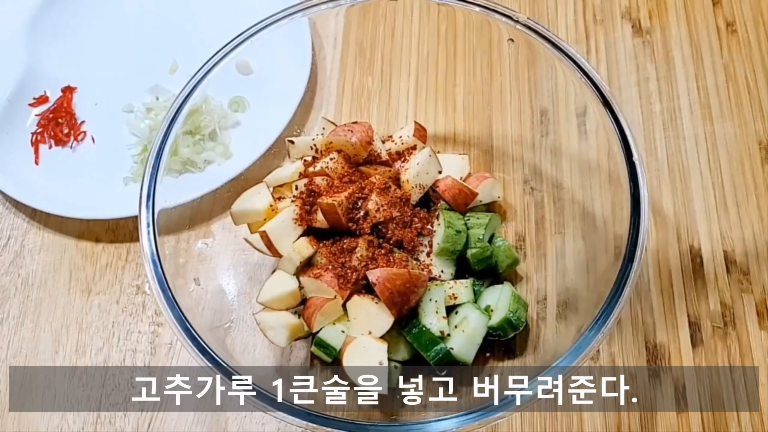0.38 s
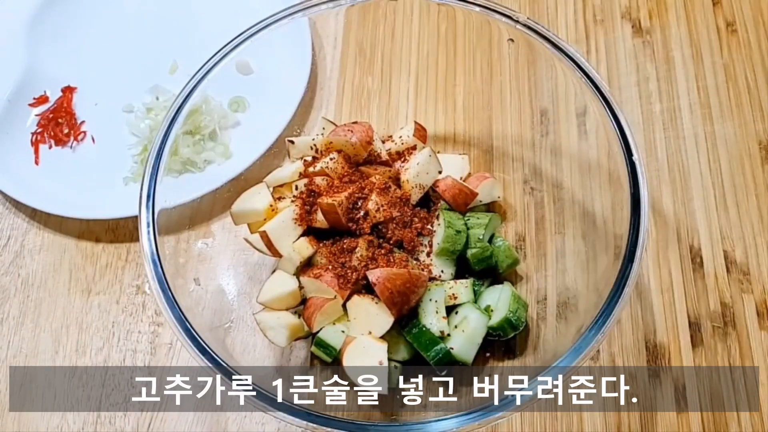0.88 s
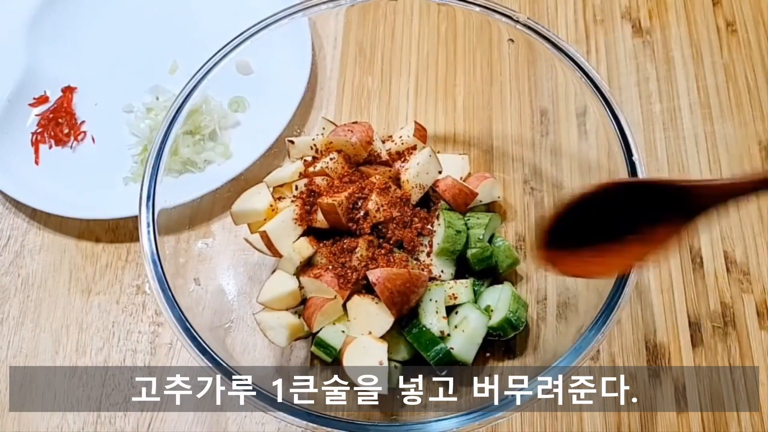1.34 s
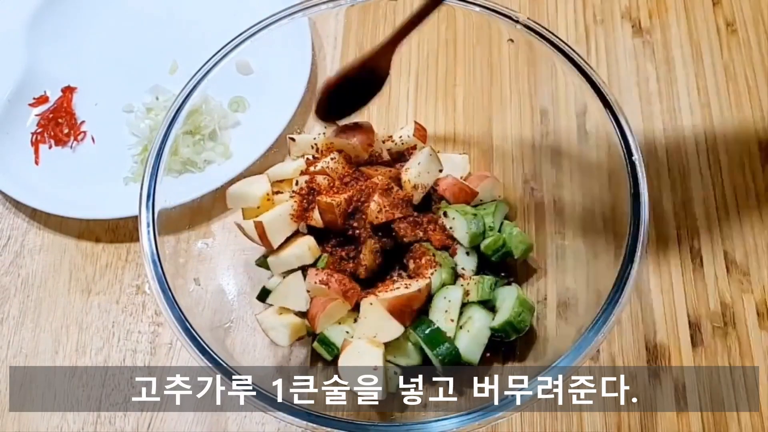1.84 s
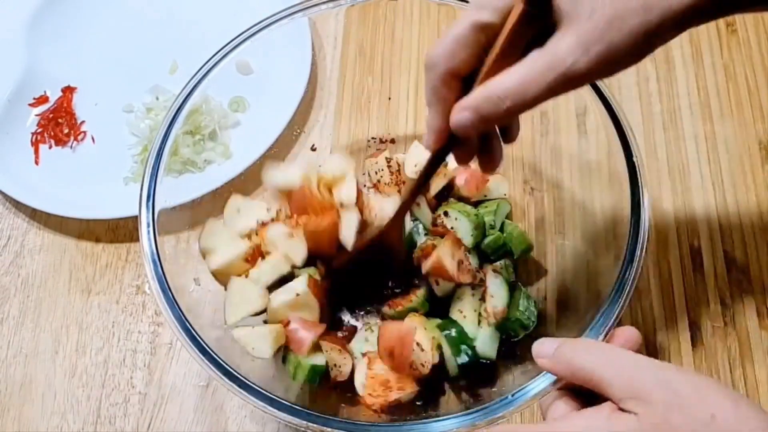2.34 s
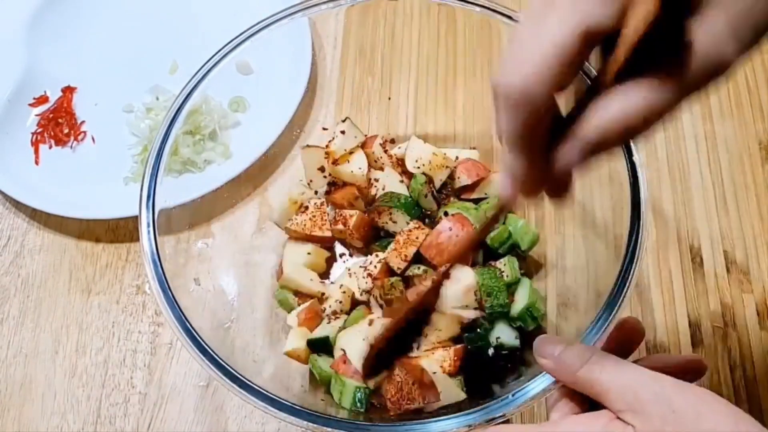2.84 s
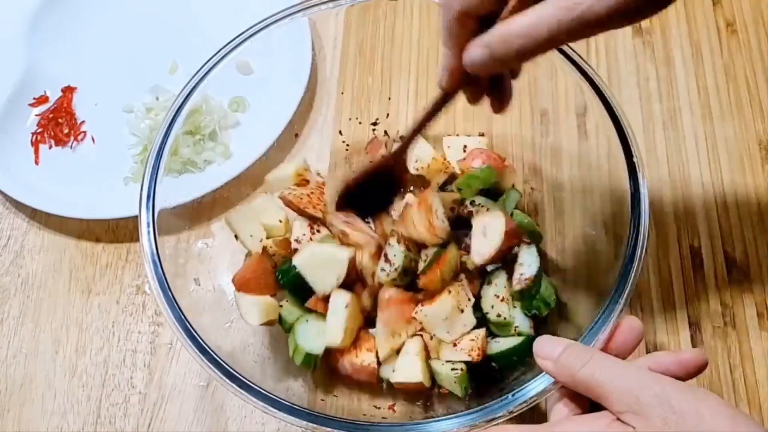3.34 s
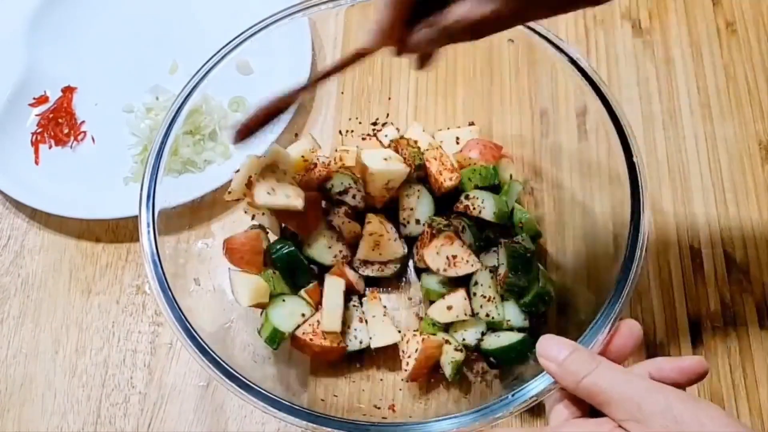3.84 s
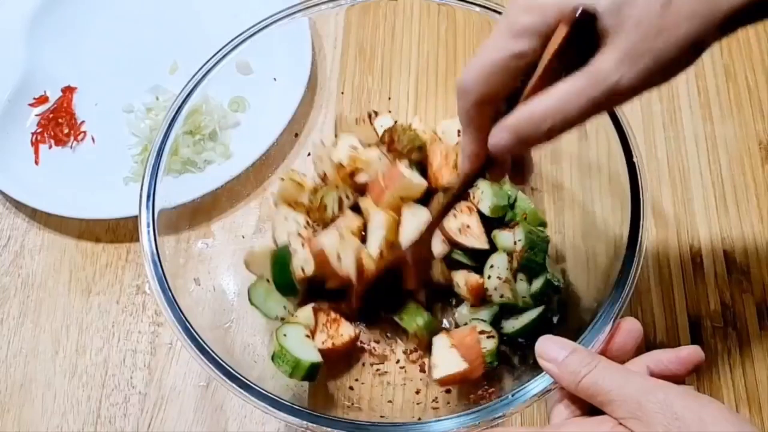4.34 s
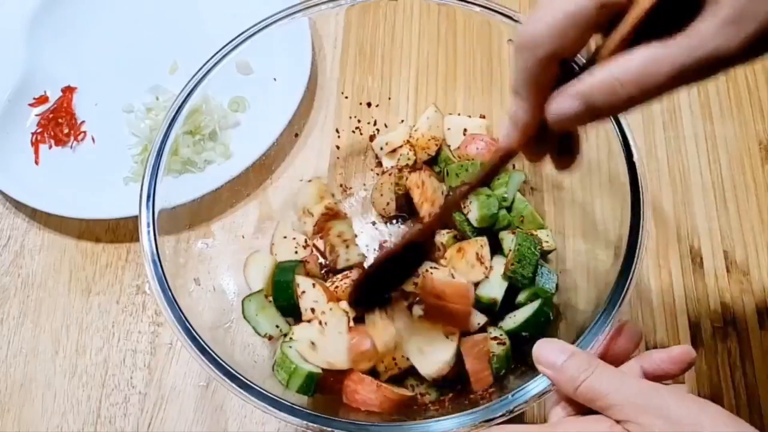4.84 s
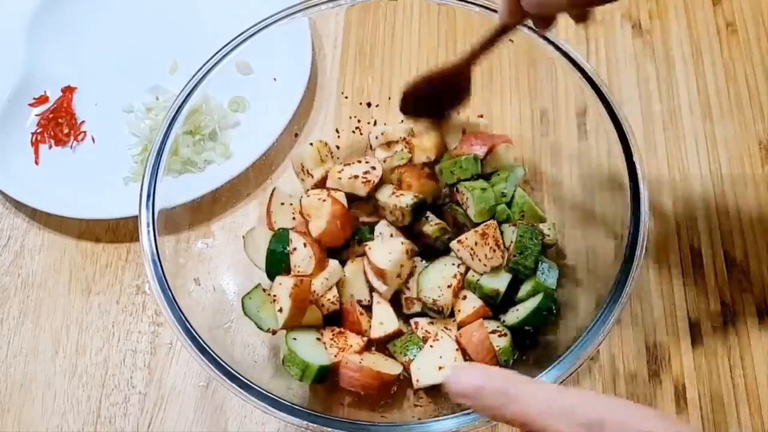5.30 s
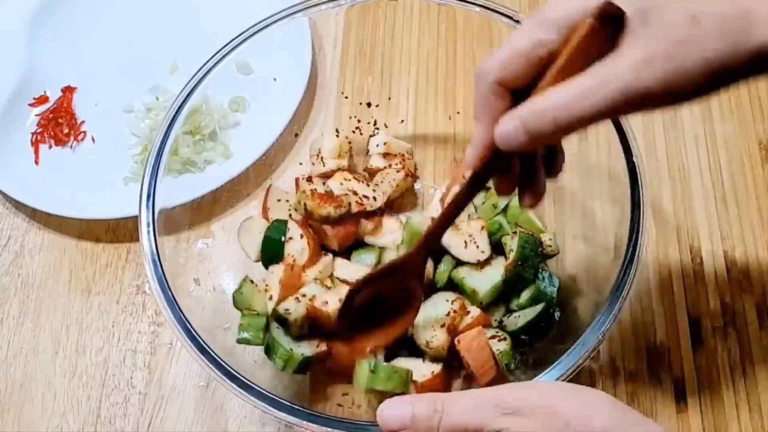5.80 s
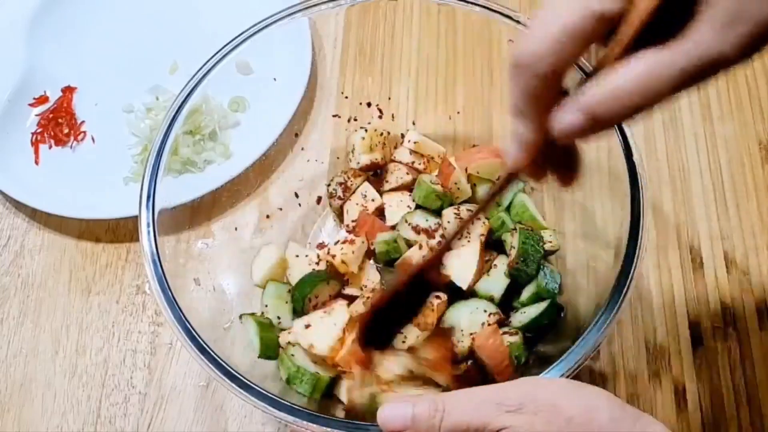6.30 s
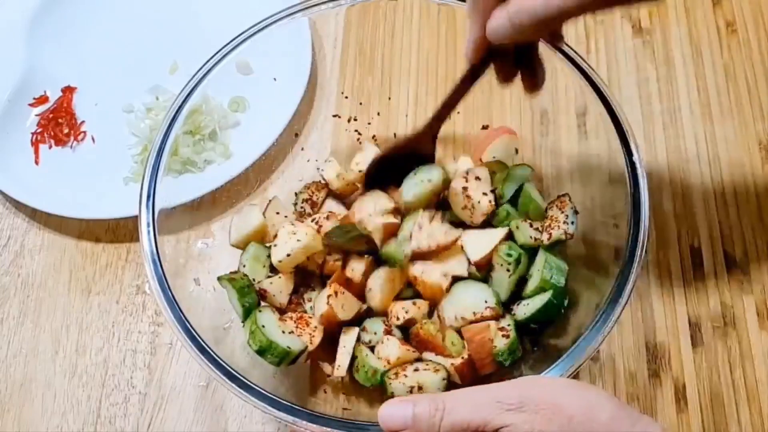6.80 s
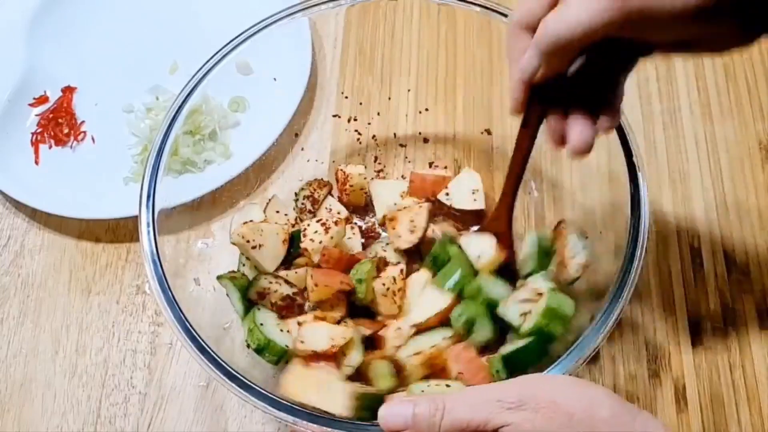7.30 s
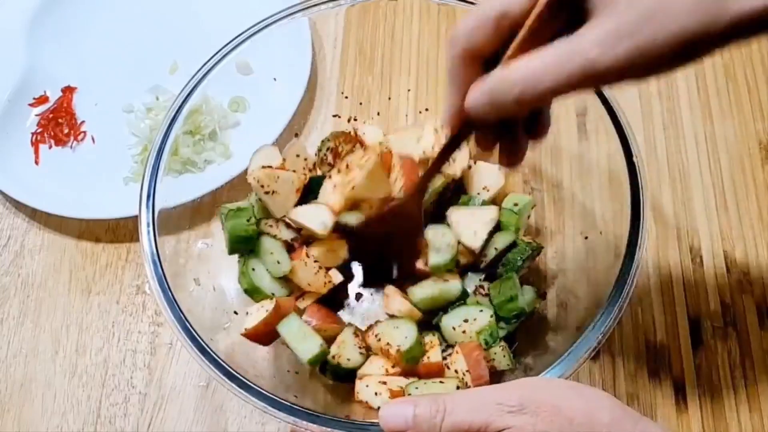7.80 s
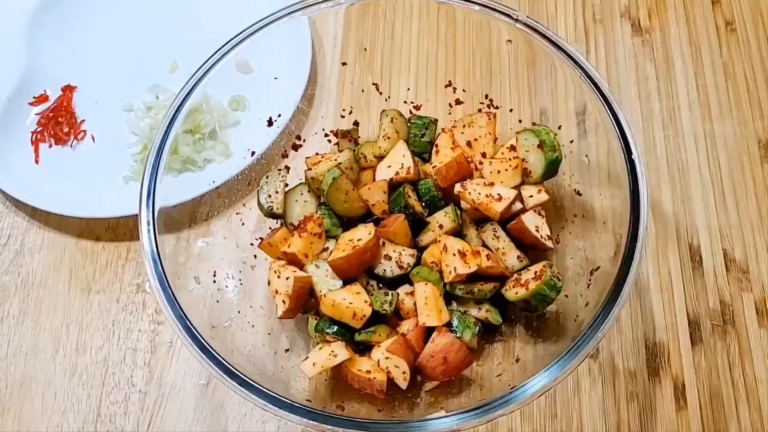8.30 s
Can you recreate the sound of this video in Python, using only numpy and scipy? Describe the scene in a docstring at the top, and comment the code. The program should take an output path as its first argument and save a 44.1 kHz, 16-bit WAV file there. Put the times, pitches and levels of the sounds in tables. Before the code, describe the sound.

Close kitchen sounds of stirring chunky salad in a glass bowl: irregular wooden knocks, short clinks, gritty wet scraping and pieces dropping.

```python
"""Tossing fruit salad in a glass bowl

A wooden spoon tosses chopped fruit and vegetables in a glass bowl on a kitchen table.
Knocks are sums of decaying modes: a short woody crack, a glass ring and the answer of a small room.
Between them filtered noise, shaped by strokes, gives the spoon and wet pieces sliding along the glass;
noise and small damped knocks give tumbling pieces. Deep swells and a low room hum lie below."""
import sys
import numpy as np
from scipy import signal
from scipy.io import wavfile

SR = 44100
rng = np.random.default_rng(int(sys.argv[2]) if len(sys.argv) > 2 else 0)


def unload_wav(signal):
    """Save mono or channel-first audio to the path in sys.argv[1] as 16-bit WAV at rate SR, clipped to [-1, 1]."""
    wavfile.write(
        sys.argv[1],
        SR,
        np.round(np.clip(np.atleast_2d(signal).T, -1, 1) * 32767).astype(np.int16),
    )


def gain_from_db(level_db):
    """Turn a decibel level (scalar or array-like) into a linear amplitude factor."""
    decades = np.asarray(level_db, float) / 20
    return 10 ** decades


N = 370528

# knocks on the bowl, spoon blows and soft touches of food pieces: (time [s], body level [dB],
# body lean [dB/octave], edge over body [dB], glass ring level [dB], favoured pitch [Hz])
KNOCKS = [(1.8700, -24, -2, 4, -34, 2070), (2.174, -39, 7, -23, -62, 1720),
          (2.216, -53, -8, -13, -49, 3000), (2.347, -16.5, -0.5, -12, -87, 3120),
          (2.5613, -21, 2, -3.5, -37.5, 1665), (2.9090, -15.5, 5.5, -41, -41.5, 1720),
          (2.9900, -44.5, -10, -9, -64, 1720), (3.194, -53.5, 5, -3, -93, 2980),
          (3.538, -53, -5, 0.5, -69, 1680), (3.8654, -21.5, 1, 2.5, -33, 1590),
          (4.1762, -56, -8, 0, -81, 1020), (4.293, -39.5, -5, -20, -72, 2000),
          (4.3060, -21, 1.5, -64, -58, 2560), (4.5770, -24, 0.5, -5.5, -42, 1710),
          (4.9, -47, -8, -4.5, -53.5, 2000), (5.2490, -26, 2.5, 4.5, -33.5, 1730),
          (6.0021, -46.5, -4.5, -9, -73, 3020), (6.0248, -14, 0.5, -5.5, -53, 2000),
          (6.362, -46.5, -7, -5, -74.5, 1030), (6.4343, -25.5, 0.5, -6, -70.5, 4000),
          (6.674, -17, 2.5, -2.5, -44, 2010), (6.945, -54, -10, -5, -66, 2600),
          (6.975, -60, -7.5, -12.5, -47, 990), (7.0420, -20.5, 3, -5, -72, 1950),
          (7.094, -47.5, -10.5, -10.5, -71, 1720), (7.628, -51.5, -8, -7.5, -64.5, 2000),
          (7.677, -40.5, -1, -11, -66, 1920), (7.96, -17.5, 2.5, -1.5, -42.5, 1640)]
# spoon and food-damped wall: (frequency [Hz], level [dB], t60 [s])
SPOON_MODES = [(377, 0.5, 0.06), (529, 1.5, 0.12), (1024, 1, 0.01), (1080, 6, 0.0087), (1707, -2, 0.012),
               (1992, -2, 0.014), (2760, -7.5, .012), (3053, -0.5, 0.013), (4066, 5, 0.0035),
               (4790, 6, 0.0043), (5190, -3, .007), (5930, 1, 0.0062), (6600, -2.5, 0.0035),
               (7480, -1, 0.004), (7930, -24.5, 0.026), (8970, 10, 0.003), (10080, 4, 0.0046),
               (10180, -19, 0.0032), (12050, -0.5, 0.007), (12980, 1.5, 0.0079), (14200, -4, 0.015),
               (14800, -3, .004)]
# free bowl modes, some in close pairs: (frequency [Hz], level [dB], t60 [s], gain per unit of rim [dB])
GLASS_MODES = [(389, -11, .9, 8), (952, -13, 1.0, 10), (966, -17, .6, 8), (1725, 0, .62, 0),
               (2681, -4, .5, -10), (3200, -9, .2, 0), (3854, -10, .24, 0), (4390, -9, .3, 0),
               (4665, -7, .22, 0), (5123, -9, .35, 0), (6162, -9, .25, 0), (7150, -11, .25, 0),
               (7451, -8, .28, 0), (7833, -8, .28, 0), (8153, -9, .25, 0), (8448, -5, .28, 0),
               (8640, -8, .22, 0), (9043, -9, .28, 0), (9297, -7, .28, 0), (9870, -8, .22, 0),
               (10430, -10, .2, 0), (11170, -10, .18, 0), (12800, -12, .18, 0), (13450, -14, .2, 0)]
# limits of thud, hollow, body, edge and tick: (frequency [Hz])
BAND_EDGES_HZ = [800, 1200, 3500, 7000]
# sound crossing the bowl: (delay [s], level [dB])
BOWL_ECHOES = [(.0009, -21.5), (.0017, -14), (.0029, -15)]
# room reflections: (frequency [Hz], t60 [s], level [dB])
ROOM = [(203, 0.36, -1.5), (512, 0.29, 4), (1330, 0.22, -7.5), (3400, 0.27, -5), (9200, 0.33, -5.5),
        (14700, 0.095, -8.5)]
# spectrum of sliding on glass: (frequency [Hz], relative level per Hz [dB])
SLIDE = [(410, -42), (700, -12), (777, -40), (1040, -23.5), (1440, -25), (1520, -6.5), (1730, -11),
         (2190, -6), (3200, -7), (7200, -11.5), (12600, -9), (16000, -27)]
# spectrum of tumbling pieces: (frequency [Hz], relative level per Hz [dB])
TUMBLE = [(160, -36), (280, -5), (515, -1), (609, -7.5), (937, -12), (1040, 0.5), (1300, -35.5),
          (1690, -47), (2860, -120)]
# range where the table top answers heavy pieces: (low [Hz], high [Hz])
BUMP_HZ = [122, 308.4]
# strokes through the food: (crest time [s], hiss level [dB], swell [s], fade [s], brightness [dB/octave]); the
# last row is not a stroke: it holds the hiss, which then stops sharply at 8.2 s
STROKES = [(0.0, -73, .1, 0.23, -3), (0.205, -72.5, 0.06, 0.16, -8), (0.683, -64, 0.2, 0.17, 1),
           (1.023, -59, 0.16, 0.12, -5), (1.427, -56, 0.032, 0.25, -5), (1.528, -55.5, 0.047, 0.12, -1),
           (1.635, -54, 0.27, 0.26, -2), (1.846, -56, 0.039, 0.18, 1), (1.956, -41.5, 0.23, 0.3, 0),
           (2.245, -46.5, 0.18, 0.31, -1.5), (2.325, -51, 0.36, 0.06, 3.5), (2.489, -56.5, 0.033, 0.029, 3),
           (2.6, -44, 0.086, 0.17, -2.5), (2.755, -52, 0.23, 0.17, -1), (2.883, -54.5, 0.074, 0.16, 0.5),
           (2.993, -39, 0.2, 0.05, -3), (3.063, -48.5, 0.13, .1, -2.5), (3.225, -49.5, 0.066, 0.096, 2.5),
           (3.3, -46.5, 0.13, 0.2, -2.5), (3.399, -43.5, 0.36, 0.054, -1), (3.545, -52, 0.052, 0.099, 2),
           (3.661, -42, 0.12, 0.11, -4), (3.8, -56, 0.5, 0.28, 3.5), (3.951, -43, 0.24, 0.37, -1),
           (4.281, -42.5, 0.092, 0.22, -0.5), (4.389, -48.5, 0.18, 0.045, -5),
           (4.45, -58, 0.065, 0.036, -4), (4.68, -46, 0.16, 0.32, -2), (4.869, -50.5, 0.11, 0.023, -4),
           (4.933, -44.5, 0.08, 0.24, -2), (5.16, -72, 0.082, 0.069, -1.5), (5.338, -41, 0.19, 0.15, 0),
           (5.448, -49, 0.12, 0.28, -2), (5.669, -47, 0.089, 0.27, -2), (5.832, -55, 0.21, 0.11, -3),
           (6.111, -46, .17, 0.24, -1.5), (6.32, -49, 0.085, 0.32, -2.5), (6.41, -54, .15, 0.19, -2),
           (6.6, -65.5, 0.13, 0.049, -2), (6.77, -43.5, 0.15, 0.23, -1.5), (7.02, -69, 0.14, .15, 1.5),
           (7.19, -53, 0.3, 0.15, -2), (7.263, -52, 0.14, 0.077, -4.5), (7.369, -52, 0.18, 0.068, -2),
           (7.6, -58, 0.4, .1, -3), (7.684, -43.5, 0.13, 0.086, -4), (7.76, -56.5, .1, .18, -3),
           (8.047, -44.5, 0.18, .1, -0.5), (8.12, -55, 0.12, .12, -1), (8.2, -63.5, .2, .02, 0.5)]
# share of the stroke's swing in dB, and level at a -50 dB stroke: (share [1], level [dB])
TUMBLE_FOLLOWS = (0.3, -55.5)
BUMP_FOLLOWS = (0.28, -63)
# heavy pieces fall back: (time [s], tumble level [dB], low bump level [dB])
DROPS = [(1.427, -73, -63), (1.85, -54, -62), (1.956, -60, -65.5), (2.245, -61.5, -65), (2.33, -49.5, -66),
         (2.464, -58.5, -70), (2.647, -43, -46), (2.998, -47, -68), (3.225, -55, -56), (3.3, -49.5, -60),
         (3.542, -57, -56), (3.662, -52.5, -72), (3.73, -51, -73), (4.18, -50.5, -69), (4.28, -50, -70.5),
         (4.662, -48, -50), (4.917, -49, -58), (5.448, -46, -63), (5.707, -44.5, -58), (6.111, -48, -64.5),
         (6.256, -53, -54), (6.316, -50, -58), (6.52, -55.5, -75), (6.76, -52.5, -63), (6.984, -50, -67),
         (7.129, -45.5, -53), (7.263, -51, -58), (7.633, -44.5, -46.5), (7.683, -39, -51),
         (8.047, -43.5, -52), (8.107, -49, -56), (8.28, -54, -66)]
# deep swells of the table: (crest time [s], level [dB], swell and fade [s])
SWELLS = [(1.43, -57, 0.082), (1.87, -50, 0.048), (2.7, -68, 0.24), (3.3, -55.5, 0.29), (3.8, -64, 0.72),
          (4.6, -58, 0.25), (5.929, -54, 0.1), (6.82, -56.5, .2), (8.3, -56.5, 0.27)]
# spectrum of the room hum: (frequency [Hz], relative level per Hz [dB])
HUM = [(13, -55), (22, -16.5), (74, 2), (112, -33.5), (184, -9), (211, -22), (432, -20), (496, -19),
       (710, -20), (837, -25), (3920, -39), (16000, -70.5)]
# spectrum of the microphone hiss: (frequency [Hz], relative level per Hz [dB])
HISS = [(1470, -29), (2500, 1), (7300, -10.5), (9080, 2.5), (10400, 1), (13200, -0.5), (16000, -4)]
# stereo correlation of the noises: (frequency [Hz], left-right likeness [1])
LIKENESS = [(30, 0.81), (150, 1), (400, 0.033), (1000, 0.019), (16000, 0.075)]

# one column per setting, one row per knock
KNOCK_S, BODY_DB, LEAN_DB, EDGE_DB, RING_DB, FAVOURED_HZ = np.transpose(KNOCKS)[:, :, None]
LEAD_S = 0.006   # knock shapes start this far ahead of the knock
THUD_DB, LEAN_PIVOT_HZ, TICK_PER_EDGE = -13.5, 2200, 1.39
FAVOUR_DB, FAVOUR_OCTAVES = 8, 0.1
BEAT_HZ, BEAT_DEPTH = 11.0, 0.51
RIM, RIM_PER_LEAN = 0.32, -0.12   # dull blows wake the low modes of the rim
SMOTHER_DB_PER_S = 30.0   # per dB of dull lean beyond 2.5: soft food stays against the glass
STROKE_DEPTH_DB, STROKE_CURVE = 29, 1.32   # fall over one swell or fade; rounding at the crest
DROP_SWELL_S, DROP_FADE_S = 0.13, 0.12
HUM_DB, HISS_DB = -59.5, -81
CONTROL_STEP, DRIFT_STEP = 64, 40   # samples between points of slow curves


def crack(level_db):
    """The woody crack: a short burst with a soft lead-in, then echoes inside the bowl."""
    t = np.arange(int(0.06 * SR)) / SR - LEAD_S
    burst = np.clip(1 + t / 0.0004, 0, 1)
    lead_in = gain_from_db(-21.5) * np.exp(np.minimum(t, 0) / 0.0054)
    blow = struck(SPOON_MODES, level_db + colour_db(SPOON_MODES), np.maximum(lead_in, burst),
                  detune=0.039, scatter_db=0.5, apart=1.866, spread=1.09)
    heard = blow.copy()
    for delay_s, db in BOWL_ECHOES:
        lag = round(delay_s * SR)
        heard[:, lag:] += gain_from_db(db) * blow[::-1, :-lag]   # channels swapped
    return heard


def ring():
    """The glass rings until the food falls back on it; only hard blows reach its high modes."""
    rim = np.clip(RIM + RIM_PER_LEAN * LEAN_DB, 0, 2)
    hz, rim_gain_db = np.array(GLASS_MODES)[:, 0], np.array(GLASS_MODES)[:, 3]
    high_db = np.where(hz > BAND_EDGES_HZ[2], colour_db(GLASS_MODES) - 4, 0)
    gains_db = RING_DB + rim * rim_gain_db + high_db
    t = np.maximum(np.arange(int(0.5 * SR)) / SR - LEAD_S, 0)
    onset = 1 - np.exp(-t / 0.0061)
    food_falls = gain_from_db(-250 * np.maximum(t - 0.24, 0))
    smother = gain_from_db(-SMOTHER_DB_PER_S * np.maximum(-LEAN_DB - 2.5, 0) * t)
    return struck(GLASS_MODES, gains_db, onset * food_falls * smother,
                  detune=0, scatter_db=1, apart=1.5, beat=BEAT_DEPTH)


def splash(level_db):
    """Burst that feeds the noise tail: all directions mixed, so shorter and with broad colour."""
    t = np.arange(int(0.03 * SR)) / SR - LEAD_S
    shape = np.clip(1 + t / 0.0004, 0, 1) * np.exp(-np.maximum(t, 0) / 0.002)
    return struck(SPOON_MODES, level_db + colour_db(SPOON_MODES, favour=0.4), shape,
                  detune=0.02, scatter_db=1, apart=1.5)


def struck(modes, gains_db, shape, detune, scatter_db, apart, spread=1.86, beat=0):
    """Every knock starts all modes under the given shape, with strengths of its own.

    The microphones face different parts of the wall, so each mode reaches them apart in phase [rad].
    Food against the wall splits modes a little: beat is the depth of their level wobble."""
    hz, level_db, t60_s = np.transpose(modes)[:3, :, None]
    t = np.arange(shape.shape[-1]) / SR - LEAD_S
    decay = gain_from_db(level_db - 60 * np.maximum(t, 0) / t60_s)
    side = np.array([[0.5], [-0.5]]) * (-1) ** np.arange(len(modes))
    shapes = np.broadcast_to(shape, (len(KNOCKS), len(t)))
    out = np.zeros((2, N + len(t)))
    for time_s, gain_db, own_shape in zip(KNOCK_S[:, 0], gains_db, shapes):
        chance = rng.standard_normal((4, 2, len(modes)))
        own_hz = hz * (1 + detune * chance[2, 0][:, None])
        tones = decay * np.exp(2j * np.pi * own_hz * t)
        beat_cycles = BEAT_HZ * gain_from_db(2.8 * chance[3, 0][:, None]) * t + chance[3, 1][:, None]
        tones = tones * (1 + beat * np.sin(2 * np.pi * beat_cycles))
        phase = spread * chance[2, 1] + apart * side
        own_db = gain_db + scatter_db * (chance[0, 0] + 0.5 * chance[1])
        strength = gain_from_db(own_db) * np.exp(1j * phase)
        at = round((time_s - LEAD_S) * SR)
        out[:, at:at + len(t)] += own_shape * (strength @ tones).imag
    return out[:, :N]


def colour_db(modes, favour=1):
    """Per knock and mode: a hard blow reaches all modes; a cushioned one loses edge, gains hollow 1 kHz."""
    hz = np.array(modes)[:, 0]
    hollow_db = -12.0 - 0.14 * EDGE_DB
    by_band = np.hstack([THUD_DB + 0 * EDGE_DB, hollow_db, 0 * EDGE_DB, EDGE_DB, TICK_PER_EDGE * EDGE_DB])
    octaves = np.where(hz < BAND_EDGES_HZ[2], np.log2(hz / LEAN_PIVOT_HZ), 0)
    off_pitch = np.log2(hz / FAVOURED_HZ) / FAVOUR_OCTAVES
    favour_db = favour * FAVOUR_DB * np.exp(-off_pitch ** 2)
    return by_band[:, np.searchsorted(BAND_EDGES_HZ, hz)] + LEAN_DB * octaves + favour_db


def room(x):
    """Noise tail of dense reflections, each band with its own t60 and level."""
    t = np.arange(int(0.8 * SR)) / SR
    tail = 0
    for hz, noise in bands(130.0, 19000, size=len(t)):
        t60_s = at_hz(ROOM, hz)
        decay = gain_from_db(at_hz(ROOM, hz, axis=2) - 60 * t / t60_s)
        tail = tail + decay * noise / np.sqrt(t60_s * SR / np.log(1e6))
    tail = tail * np.clip((t - 0.001) / 0.003, 0, 1)   # builds up from 1 to 4 ms
    return signal.fftconvolve(x, tail, axes=1)[:, :N]


def tossing():
    """Stick-slip hiss of wood and peel on glass, the tumble of the pieces and their bumps on the bottom."""
    hiss_db, tumble_db, bump_db, bright_db = gestures()
    slips_db = 1.8 * drift(50) + 1.6 * drift(14)   # common to all bands
    hiss = 0
    for hz, noise in bands(678, 15750, size=N):
        own_db = 2.0 * drift(15.3) + 1.6 * drift(40)
        hiss = hiss + gain_from_db(at_hz(SLIDE, hz) + bright_db * np.log2(hz / 4000) + slips_db + own_db) * noise
    tumble = sum(gain_from_db(at_hz(TUMBLE, hz) + 4.8 * drift(30)) * noise for hz, noise in bands(318.0, 1288, size=N))
    bumps = sum(gain_from_db(5.0 * drift(22)) * noise for hz, noise in bands(*BUMP_HZ, size=N))
    sliding = gain_from_db(hiss_db) * rms_one(hiss) * grit(per_s=60.0, spread_db=3.5)
    tumbling = gain_from_db(tumble_db) * (0.5 * rms_one(tumble) + 0.5 * patter(per_s=250.0))
    return sliding + tumbling + gain_from_db(bump_db) * rms_one(bumps)


def gestures():
    """Hiss, tumble, bump and brightness in time: strokes drive all, falling pieces add weight."""
    crest_s, db, swell_s, fade_s, bright_db = np.transpose(STROKES)[:, :, None]
    power = gain_from_db(2 * db) * hump(crest_s, swell_s, fade_s)
    hiss_db = 10 * np.log10(power.sum(0))
    bright_db = (power * bright_db).sum(0) / power.sum(0)
    drop_s, tumble_db, bump_db = np.transpose(DROPS)[:, :, None]
    falls = hump(drop_s, DROP_SWELL_S, DROP_FADE_S)
    heavy_db = []
    for (share, base_db), drop_db in ((TUMBLE_FOLLOWS, tumble_db), (BUMP_FOLLOWS, bump_db)):
        stroke_power = gain_from_db(2 * (share * (hiss_db + 50) + base_db))
        heavy_db.append(10 * np.log10(stroke_power + (gain_from_db(2 * drop_db) * falls).sum(0)))
    return [every_sample(curve) for curve in (hiss_db, *heavy_db, bright_db)]


def hump(crest_s, swell_s, fade_s):
    """Power of one gesture per row: it swells to its crest and fades."""
    t = np.arange(0, N + CONTROL_STEP, CONTROL_STEP) / SR - crest_s
    far = np.where(t < 0, -t / np.maximum(swell_s, 0.01), t / np.maximum(fade_s, 0.01))
    return gain_from_db(-2 * np.minimum(STROKE_DEPTH_DB * far ** STROKE_CURVE, 90))


def grit(per_s, spread_db):
    """Gain of the hiss as powder and wet edges catch: short random spurts on a steady base; rms 1."""
    spurts = gain_from_db(spread_db * np.minimum(rng.exponential(1, N), 2)) * (rng.random(N) < per_s / SR)
    r = np.exp(-1 / (0.0012 * SR))
    return rms_one(1 + 0.5 * signal.lfilter([1], [1, -r], spurts))


def patter(per_s):
    """Pieces knock lightly on the wall and on each other, each waking one damped mode; rms 1."""
    out = np.zeros((2, N))
    sizes = gain_from_db(4.5 * np.minimum(rng.exponential(1, N), 3)) * (rng.random(N) < per_s / SR)
    dealt, sides = rng.integers(0, 8, N), rng.standard_normal((2, N))
    for k, (hz, _, t60_s) in enumerate(SPOON_MODES[:8]):
        r = gain_from_db(-60 / (min(1.3 * t60_s, 0.045) * SR))
        w = 2 * np.pi * hz / SR
        soft = gain_from_db(-4 * np.log2(hz / 500))
        hits = sizes * sides * (dealt == k) + 1e-18
        out += soft * signal.lfilter([0, np.sin(w)], [1, -2 * r * np.cos(w), r * r], hits)
    return rms_one(out)


def rumble():
    """The table carries the work of hand and spoon as deep swells of low noise."""
    crest_s, db, length_s = np.transpose(SWELLS)[:, :, None]
    gain = np.sqrt((gain_from_db(2 * db) * hump(crest_s, length_s, length_s)).sum(0))
    deep = sum(noise for _, noise in bands(40.0, 110.0, size=N))
    return every_sample(gain) * rms_one(deep)


def hum():
    """Low room noise that wavers a little, and the faint steady hiss of the microphones."""
    low = sum(gain_from_db(at_hz(HUM, hz) + 0.35 * drift(1.3)) * noise for hz, noise in bands(22, 8000, size=N))
    hiss = sum(gain_from_db(at_hz(HISS, hz)) * noise for hz, noise in bands(2300, 15500, size=N))
    return gain_from_db(HUM_DB) * rms_one(low) + gain_from_db(HISS_DB) * rms_one(hiss)


def bands(low_hz, high_hz, size):
    """Roughly half-octave bands of stereo noise: centre Hz and the noise, equal power per Hz."""
    edges = np.geomspace(low_hz, high_hz, int(2 * np.log2(high_hz / low_hz)) + 2)
    white = rng.standard_normal((2, 2, size))   # neighbouring bands get unrelated noise
    for k, (low, high) in enumerate(zip(edges, edges[1:])):
        band = signal.butter(2, [low, high], "band", fs=SR, output="sos")
        mid, side = signal.sosfilt(band, white[k % 2])
        hz = np.sqrt(low * high)
        alike = np.clip(at_hz(LIKENESS, hz), -1, 1)
        yield hz, np.sqrt(1 + alike) * mid + np.sqrt(1 - alike) * side * [[1], [-1]]


def drift(rate_hz):
    """Slow chance of spread 1: noise through a double one-pole low-pass."""
    r = np.exp(-2 * np.pi * rate_hz * DRIFT_STEP / SR)
    white = rng.standard_normal(N // DRIFT_STEP + 2002)
    slow = signal.lfilter([1], [1, -2 * r, r * r], white)[2000:]   # settled part
    return np.interp(np.arange(N) / DRIFT_STEP, np.arange(len(slow)), rms_one(slow))


def every_sample(curve):
    """Interpolate a control curve to the sample rate."""
    return np.interp(np.arange(N) / CONTROL_STEP, np.arange(len(curve)), curve)


def at_hz(points, hz, axis=1):
    """Read a table on a log-frequency axis."""
    return np.interp(np.log(hz), np.log(np.array(points)[:, 0]), np.array(points)[:, axis])


def rms_one(x):
    """Scale to rms 1."""
    return x / np.sqrt(np.mean(x ** 2) + 1e-20)


def scene():
    """Knocks in the room, tossing, hum and rumble.

    After hard blows a dense shimmer of many unresolved glass modes is added through the noise tail."""
    glass = ring()
    shimmer_db = RING_DB + 16.5 + np.minimum(EDGE_DB, 0)
    splash_db = 10 * np.log10(gain_from_db(2 * BODY_DB) + gain_from_db(2 * shimmer_db))
    tail = room(splash(splash_db) + 0.15 * glass)
    return crack(BODY_DB) + glass + tail + tossing() + hum() + rumble()


def low_pass(x):
    """Removes everything above the highest recorded frequency."""
    return signal.sosfilt(signal.butter(12, 16630, fs=SR, output="sos"), x)


def record(dry):
    """Peaks beyond 0.6 are rounded towards a ceiling of 0.9."""
    knee, top = 0.6, 0.9
    straight = np.clip(dry, -knee, knee)
    mix = straight + (top - knee) * np.tanh((dry - straight) / (top - knee))
    return low_pass(mix)


dry = scene()
out = record(dry)
unload_wav(out)
```